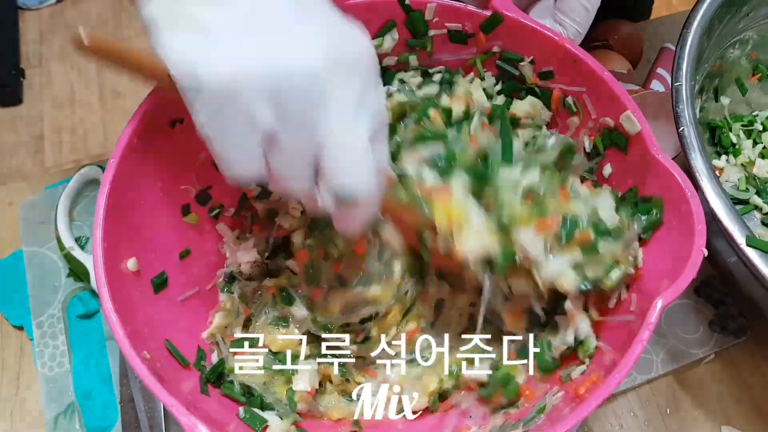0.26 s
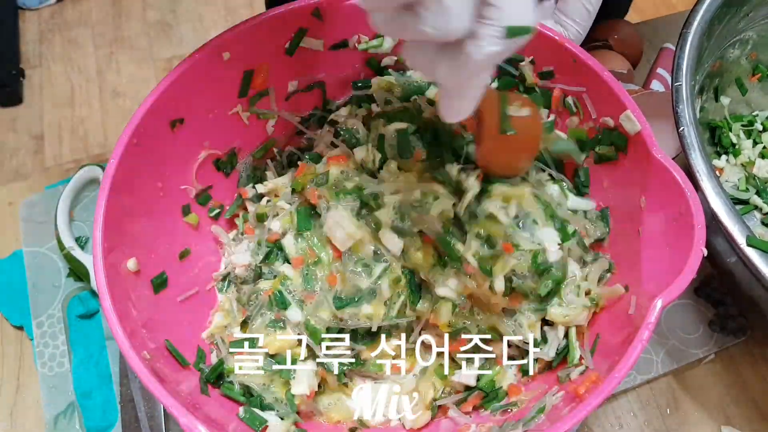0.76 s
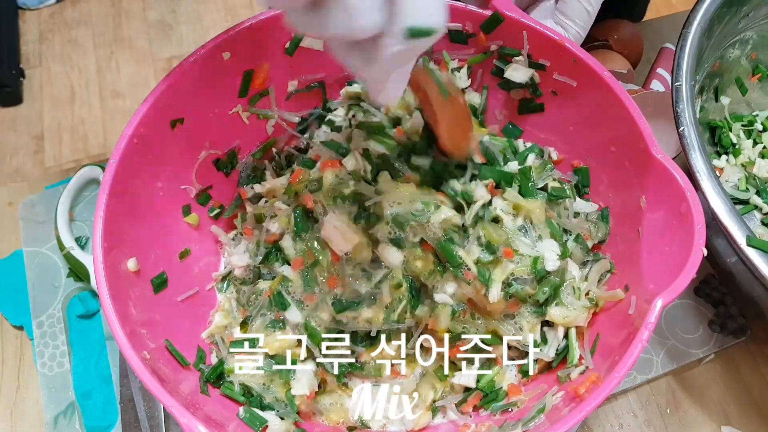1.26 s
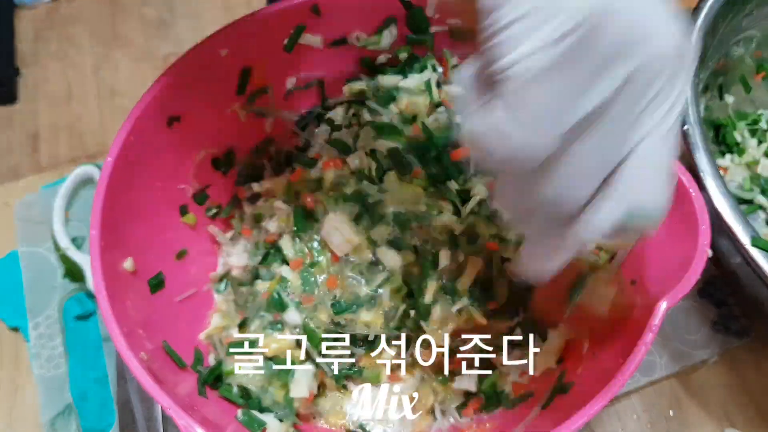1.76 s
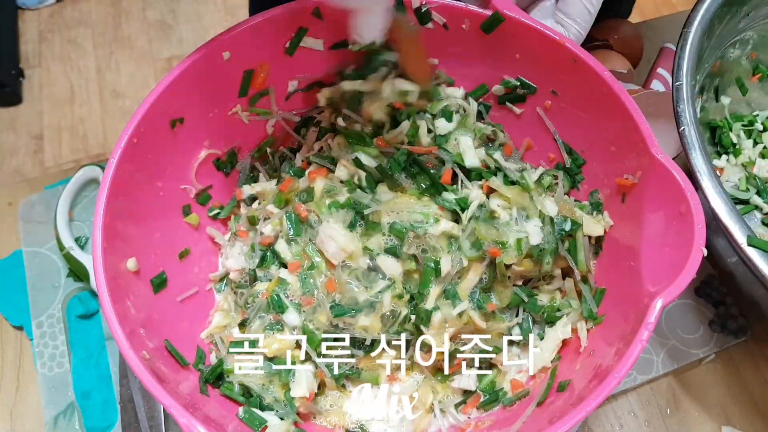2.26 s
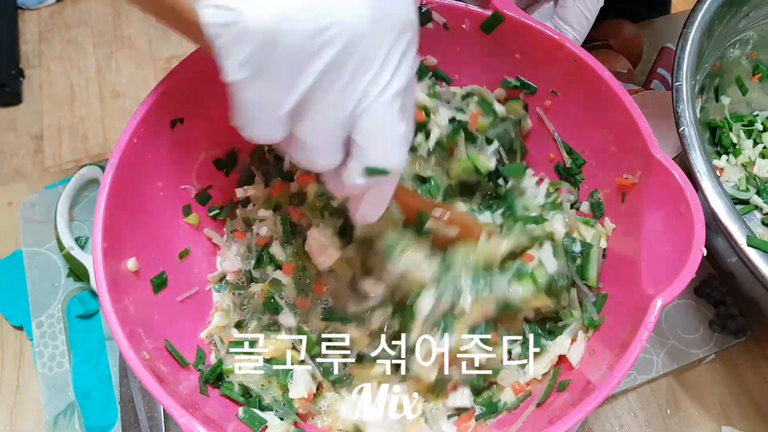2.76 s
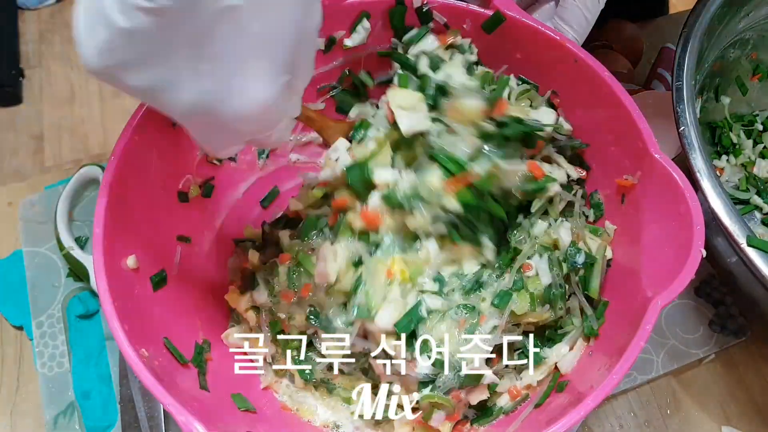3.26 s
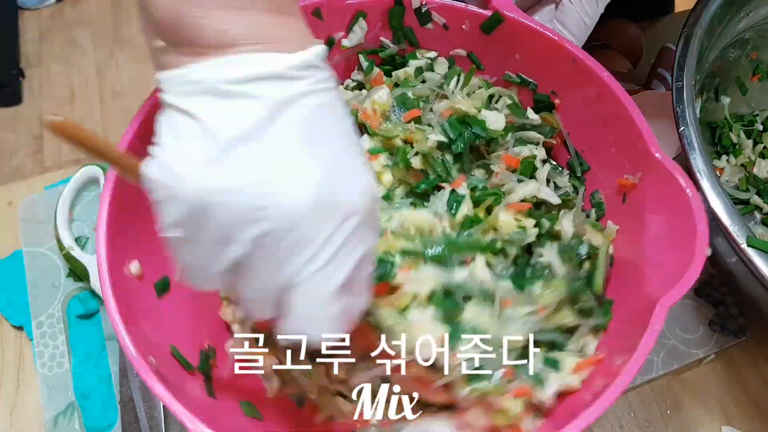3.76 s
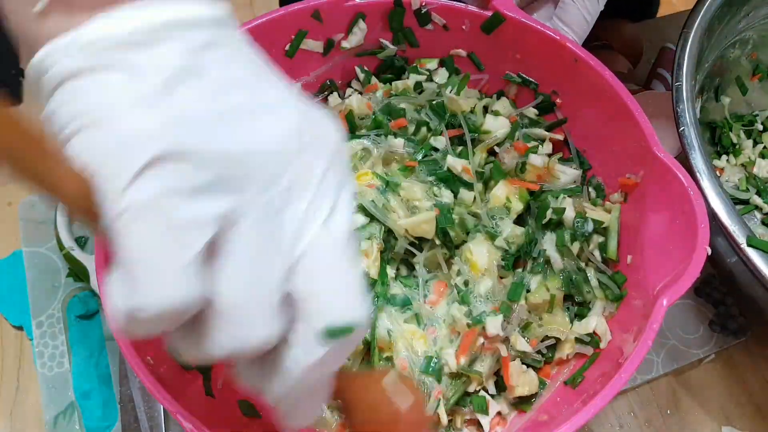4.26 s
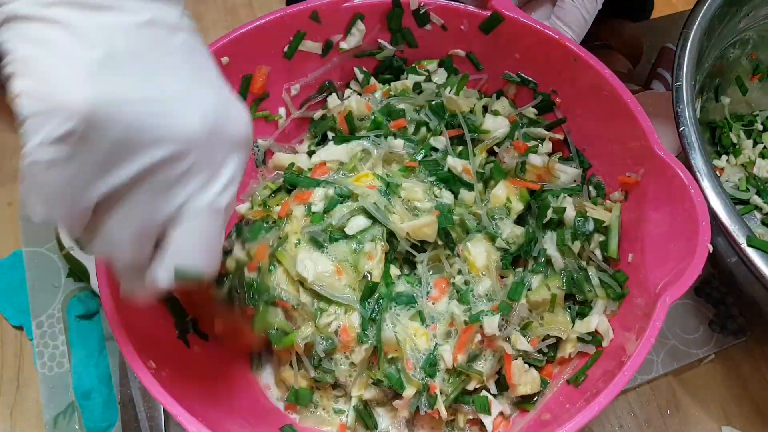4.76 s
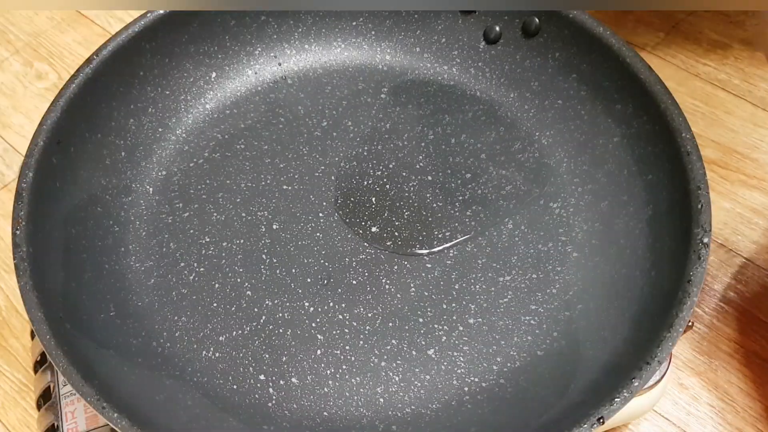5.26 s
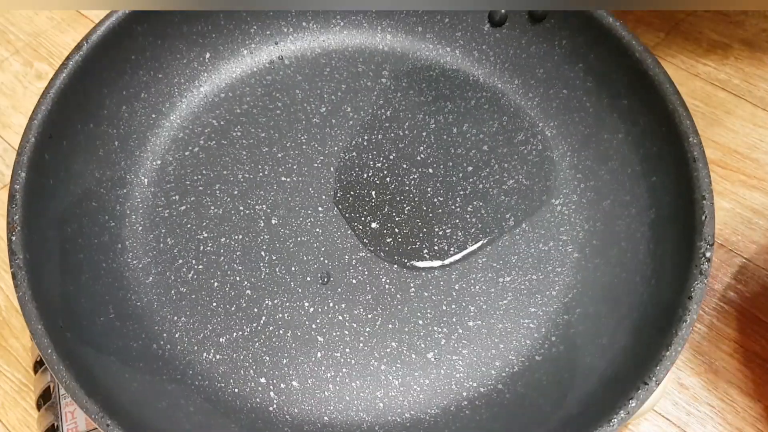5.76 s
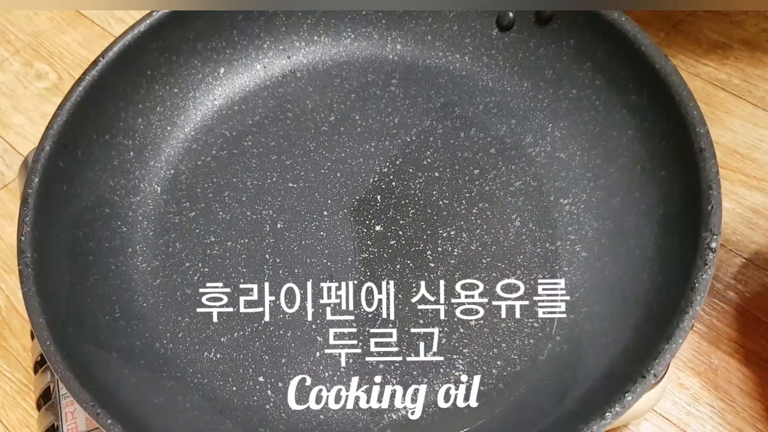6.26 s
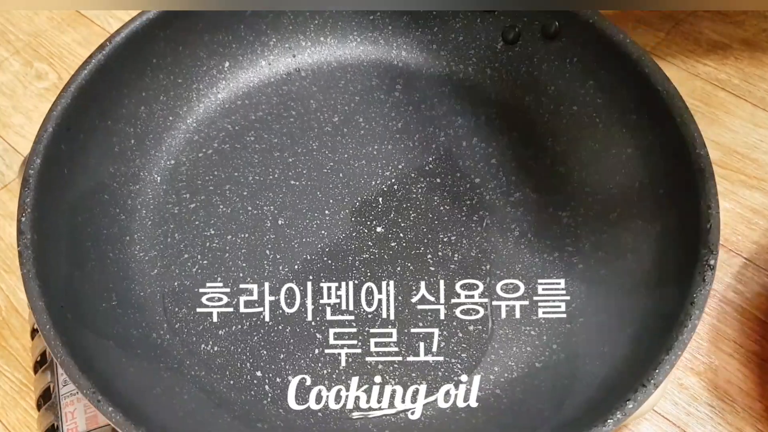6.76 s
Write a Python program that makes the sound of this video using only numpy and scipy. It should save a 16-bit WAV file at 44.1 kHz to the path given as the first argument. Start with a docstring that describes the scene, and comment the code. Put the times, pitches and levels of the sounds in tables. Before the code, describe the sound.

Moist batter squishes and crackles softly as a wooden spoon pushes it around, thudding against the plastic bowl with short hollow clacks. Quiet kitchen air and a low humming machine sit behind until the machine shuts off. An abrupt change brings a low, hollow burner roar and fine hiss; a pan gives light knocks, then a cluster of ringing, scraping clanks. Close microphones, small room with short echoes.

```python
"""First, a wooden spoon turns wet vegetable batter in a plastic bowl, over kitchen air and a low machine rumble.
Knocks are damped thumps plus bowl modes; squelches and the moist rustle are filtered clusters of tiny pops.
Partway through the mixing the rumble and its hum stop.
Then, at once, the stove: shaped noise makes a burner hum and hiss while a frying pan, built from dying modes
and chatter, is tilted and clanks on the grate. A small kitchen, a close pair of microphones."""
import sys
import numpy as np
from scipy import signal
from scipy.fft import rfft, irfft
from scipy.io import wavfile
from scipy.ndimage import uniform_filter1d

SR = 44100
rng = np.random.default_rng(int(sys.argv[2]) if len(sys.argv) > 2 else 0)


def master(y):
    """Save y as 16-bit WAV."""
    cut = np.clip(np.atleast_2d(y).T, -1, 1)
    pcm = np.round(cut * 32767)  # scale
    wavfile.write(sys.argv[1], SR, pcm.astype(np.int16))


N = 309700
TIME = np.arange(N) / SR
STOVE_S = 4.935  # the mixing gives way to the stove


def amp(db):
    """Decibels to gain."""
    return 10 ** (np.asarray(db) / 20)


def unit(x):
    """Scaled to rms 1."""
    return x / np.sqrt(np.mean(x ** 2) + 1e-20)


def level_attack(x, attack_s=.02):
    """Scaled to rms 1 over the first moments of a blow."""
    return x / np.sqrt(np.mean(x[..., :int(attack_s * SR)] ** 2) + 1e-20)


def read(points, hz):
    """Interpolates a table on a log-frequency axis."""
    f, value = np.transpose(points)
    return np.interp(np.log(hz + 1), np.log(f + 1), value)


def add(mix, s, sound):
    """Lays a stereo sound into the mix at s seconds."""
    part = mix[:, max(round(s * SR), 0):][:, :sound.shape[1]]
    part += sound[:, :part.shape[1]]


def colour(x, spectrum, size=2048):
    """Causal minimum-phase filter with the given spectrum, so clicks keep their sharp front."""
    log_gain = np.log(amp(read(spectrum, abs(np.fft.fftfreq(size, 1 / SR)))))
    response = np.exp(np.conj(signal.hilbert(log_gain)))
    taps = np.fft.ifft(response).real[:size // 2]
    return signal.fftconvolve(x, taps[None], axes=1)[:, :x.shape[1]]


def hump(hz, centre_hz, octaves):
    """Bell-shaped emphasis on a log-frequency axis, height 1."""
    return np.exp(-.5 * (np.log2(hz / centre_hz) / octaves) ** 2)


def voiced(spectrum, centre_hz, lift_db, octaves):
    """A spectrum with one broad resonance raised."""
    hz = np.geomspace(100, 20000, 70)
    return np.column_stack([hz, read(spectrum, hz) + lift_db * hump(hz, centre_hz, octaves)])


def crackle(envelope, per_s, spread_db, lag_s, side_db=3):
    """Tiny pops of uneven size under an envelope, each with its own lag and level between the two sides."""
    n = len(envelope)
    at = np.flatnonzero(rng.random(n) < per_s / SR)
    uneven = amp(spread_db * np.minimum(rng.exponential(1, len(at)), 4))
    size = envelope[at] * uneven * rng.choice([-1, 1], len(at))
    lag, side = rng.standard_normal((2, len(at)))
    at_right = np.clip(at + np.round(lag * lag_s * SR).astype(int), 0, n - 1)
    left = np.bincount(at, size * amp(side * side_db / 2), n)
    right = np.bincount(at_right, size * amp(-side * side_db / 2), n)
    return np.array([left, right])


def ring(modes, t, vary_db, detune, apart_hz):
    """Dying modes; each blow lands elsewhere, and high modes reach the two microphones out of step."""
    hz, db, t60 = np.transpose(modes)[:, :, None]
    size, tune, skew, phase = rng.uniform(-0.99, 1, (4, len(modes), 1))
    swing = np.exp(2j * np.pi * (hz * (1 + detune * tune) * t + phase))
    z = amp(db + vary_db * size - 60 * t / t60) * swing
    turn = np.exp(1j * np.sign(skew) * np.pi / 4 * np.minimum(hz / apart_hz, 1))
    onset = 1 - np.exp(-t / 0.001)
    return np.array([(z * turn).sum(0).imag, (z / turn).sum(0).imag]) * onset


def thump(t, hz, swell_s, apart):
    """A few swings of a heavily damped wall, reaching the microphones a phase angle apart."""
    turn = np.array([[1], [-1]]) * apart / 2
    return (t / swell_s) ** 2 * np.exp(-t / swell_s) * np.sin(2 * np.pi * hz * t + turn)


# spoon against the bowl: t/s, thud level/dB, thud f/Hz, clack level/dB, clack f/Hz, wet splat level/dB
SPOON_KNOCKS = [(0.977, -30, 930, -32.5, 2150, -40.5), (1.1899, -20, 995, -26.5, 1560, -36),
                (1.5077, -46.5, 760, -52.5, 2050, -58), (1.786, -34.5, 916, -39.6, 1760, -68),
                (1.8635, -42.7, 930, -54, 2060, -53), (1.931, -42, 1030, -40.5, 1670, -50.5),
                (2.0306, -38, 796, -40, 1880, -48), (2.261, -23.5, 1046, -30, 1640, -37),
                (3.0267, -26.5, 930, -34, 1480, -47), (4.3739, -26.7, 895, -34.5, 1730, -47.5),
                (4.5988, -28, 1015, -28.6, 1720, -53.5), (4.6762, -40.5, 820, -41.5, 2230, -49.5),
                (4.7697, -27, 983, -33, 2010, -39.5)]
# modes of the bowl loaded with batter: f/Hz, relative level/dB, t60/s
BOWL_MODES = [(232.4, -14, 0.063), (332, -12, 0.051), (618, -9.5, 0.087), (728, 3.5, 0.014),
              (830, 3.5, 0.017), (1080, -7.5, 0.033), (1207, -3, 0.054), (1512, -12, 0.094),
              (1810, -7, 0.038), (1960, -21, 0.06), (2390, 0.5, 0.021), (2700, -12.5, 0.031)]
# spectrum of the pushed mass of batter: f/Hz, relative level per Hz/dB
MASS_SPECTRUM = [(150, -8), (400, -8.5), (720, 2), (1050, -2.5), (1400, -4), (1950, -4), (2600, -4),
                 (3600, -20.5), (8000, -32), (16000, -58)]
# spectrum of bursting wet films: f/Hz, relative level per Hz/dB
SPRAY_SPECTRUM = [(500, -35), (2000, -20.5), (3200, 5), (4600, -0.5), (5800, -4), (7900, -1), (9300, -8),
                  (12000, -6), (16000, -7)]
SPLAT_HZ = 4440  # usual centre of the spray from squeezed batter


def knocks():
    """The spoon squeezes out a film of batter and hits the wall; the bowl rings briefly and its load shudders."""
    out, t = np.zeros((2, N)), np.arange(SR // 7) / SR
    for s, thud_db, thud_hz, clack_db, clack_hz, splat_db in SPOON_KNOCKS:
        low = ring(BOWL_MODES[:7], t, vary_db=3, detune=.03, apart_hz=1200)
        high = ring(BOWL_MODES[7:], t, vary_db=3, detune=.05, apart_hz=2000)
        load_pops = crackle(np.exp(-t / 0.013), per_s=4000, spread_db=0.0, lag_s=0.00021)
        shudder = colour(load_pops, MASS_SPECTRUM)
        apart = 0.67 * rng.choice([-1, 1])  # radians, to either side

        thud = level_attack(thump(t, thud_hz, swell_s=0.00071, apart=apart))
        thud = thud + amp(-11.0) * level_attack(low) + amp(-13.5) * level_attack(shudder)

        clack = level_attack(thump(t, clack_hz, swell_s=.0007, apart=apart))
        crack = thump(t, clack_hz, swell_s=0.00018, apart=apart)
        clack = clack + amp(-3) * level_attack(crack) + amp(-3) * level_attack(high)

        film = np.exp(-t / 0.0027) + amp(-16.5) * np.exp(-t / 0.028)
        pops = crackle(film, per_s=8300, spread_db=5.0, lag_s=.0001)
        splat = colour(pops, voiced(SPRAY_SPECTRUM, SPLAT_HZ, lift_db=6.0, octaves=1.0))

        add(out, s, amp(thud_db) * level_attack(thud) + amp(clack_db) * level_attack(clack))
        add(out, s - .0007, amp(splat_db) * level_attack(splat))  # the film bursts just before the wall is hit
    return out


# spoon strokes through the batter: start t/s, swell time/s, fade time/s, push level/dB, wet fizz level/dB
SPOON_STROKES = [(-0.02, 0.029, 0.11, -55, -60), (0.142, 0.091, 0.11, -45.5, -54.5),
                 (0.48, .07, 0.046, -57.5, -63.5), (0.76, 0.091, 0.055, -56.5, -59),
                 (0.93, 0.12, 0.068, -53.5, -58.5), (1.49, .11, 0.053, -50, -52.5),
                 (1.79, .12, 0.056, -50.5, -55), (1.98, 0.12, 0.036, -56, -58.5),
                 (2.53, 0.09, 0.046, -54.5, -61.5), (2.73, 0.091, 0.098, -57.5, -61),
                 (3.02, 0.058, 0.064, -57.5, -52.5), (3.109, 0.072, 0.078, -45.5, -52.5),
                 (3.45, 0.12, 0.08, -54.5, -66.5), (3.732, 0.11, 0.3, -52.5, -60.5),
                 (4.37, 0.094, 0.018, -62, -64.5), (4.77, 0.017, 0.1, -48.5, -51.5)]
SWELL_CURVE = 0.73  # power of time by which a stroke builds up


def strokes():
    """Strength of push and of fizz: each stroke swells as the spoon digs in, then fades as the batter settles."""
    power = np.zeros((2, N))
    for start, swell_s, fade_s, push_db, fizz_db in SPOON_STROKES:
        age = np.maximum(TIME - start, 0)
        swell = np.minimum(age / swell_s, 1) ** SWELL_CURVE
        shape = swell * np.exp(-np.maximum(age - swell_s, 0) / fade_s)
        power += (amp([[push_db], [fizz_db]]) * shape) ** 2
    return np.sqrt(power) * (TIME < STOVE_S)


def squelch(body_gain, pocket_hz, spray_gain, spray_hz, fade_s):
    """A cluster of bursting films, coloured by the air pocket behind it; slow tears pop more sparsely."""
    u = 2 * np.arange(SR // 14) / SR / fade_s
    pops = crackle((.3 + u) * np.exp(-u), per_s=1700 + 16 / fade_s, spread_db=3.2, lag_s=.00012)
    body = level_attack(colour(pops, voiced(MASS_SPECTRUM, pocket_hz, lift_db=9, octaves=.33)))
    spray = level_attack(colour(pops, voiced(SPRAY_SPECTRUM, spray_hz, lift_db=8, octaves=.28)))
    return body_gain * body + spray_gain * spray


# louder slaps of batter: t/s, body level/dB, air pocket f/Hz, spray level/dB, spray f/Hz, fade time/s
LOUD_SQUELCHES = [(0.008, -50, 800, -74, 3800, 0.0052), (0.040, -50, 2120, -55.5, 5330, 0.0075),
                  (0.232, -47, 1230, -50.5, 3900, .003), (0.711, -48, 860, -61, 5450, 0.0042),
                  (0.7244, -32, 1740, -35, 7840, 0.0065), (1.243, -47, 1320, -46, 5250, .004),
                  (1.517, -47, 1680, -52, 6500, .005), (1.563, -54, 1520, -51.5, 4700, 0.0062),
                  (2.305, -45.5, 1100, -51.5, 5750, 0.0063), (3.108, -48, 720, -74, 4250, 0.0018),
                  (3.122, -62, 1250, -48, 4800, 0.0055), (3.141, -44, 2270, -41.5, 4750, 0.0037),
                  (3.22, -47, 1820, -55, 4500, 0.0031), (3.358, -52.5, 900, -70, 4250, 0.0013),
                  (3.765, -52, 2480, -58.5, 3420, 0.0029), (3.82, -48, 710, -59, 7740, 0.0059),
                  (3.878, -40.5, 1780, -70, 3400, .012), (4.05, -66, 710, -57, 6540, 0.0019),
                  (4.168, -55, 1400, -75, 3700, 0.0028), (4.437, -50.5, 1080, -47.5, 6200, 0.0037),
                  (4.457, -45.5, 2380, -50.5, 5150, .005), (4.608, -34, 1070, -51, 3440, 0.0036),
                  (4.629, -45.5, 1310, -52.5, 6160, 0.0041), (4.6692, -46, 1580, -50, 5050, 0.0055),
                  (4.876, -53.5, 2110, -53, 4760, .013)]
# chance squelches: levels relative to the stroke that frees them, and a brief fade
SMALL_BODY_DB, SMALL_SPRAY_DB, SMALL_SPREAD_DB, SMALL_FADE_S = -3, -9, 3.5, .0025
POCKET_HZ, POCKET_OCTAVES = 1300, 0.46  # typical air pocket, and how far pockets differ


def squelches(push, fizz, count=70):
    """The loud slaps, and small ones scattered by chance that follow the strength of the stroke under way."""
    out = np.zeros((2, N))
    for s, body_db, pocket_hz, spray_db, spray_hz, fade_s in LOUD_SQUELCHES:
        add(out, s, squelch(amp(body_db), pocket_hz, amp(spray_db), spray_hz, fade_s))
    times = (np.arange(count) + rng.random(count)) * STOVE_S / count
    chances = np.clip(rng.standard_normal((count, 2)), -2, 2)
    for s, (size, pocket) in zip(times, chances):
        at = int(s * SR)
        pocket_hz = POCKET_HZ * 2 ** (POCKET_OCTAVES * pocket)
        body_gain, spray_gain = amp(SMALL_BODY_DB) * push[at], amp(SMALL_SPRAY_DB) * fizz[at]
        small = squelch(body_gain, pocket_hz, spray_gain, SPLAT_HZ, SMALL_FADE_S)
        add(out, s, amp(SMALL_SPREAD_DB * size) * small)
    return out


def smacks(envelope, edges_hz, per_s, spread_db):
    """Small wet pops of many sizes; each size sounds in its own narrow band."""
    bands = [signal.butter(2, pair, "band", fs=SR, output="sos") for pair in zip(edges_hz, edges_hz[1:])]
    return sum(signal.sosfilt(band, crackle(envelope, per_s, spread_db, lag_s=.00013)) for band in bands)


def stirring(push, fizz):
    """Chopped leaves slide and unstick in clumps, under the stroke of the spoon."""
    clumps = amp(2.4 * unit(uniform_filter1d(rng.standard_normal(N), 400)))  # 2.4 dB rms of unevenness
    large_hz = [150, 600, 1000, 1500, 2200, 3200, 6000]
    small_hz = [1500, 3600, 5200, 7500, 11000, 17000]
    mass = unit(colour(smacks(clumps, large_hz, per_s=700, spread_db=4), MASS_SPECTRUM))
    films = unit(colour(smacks(clumps, small_hz, per_s=650, spread_db=4.8), SPRAY_SPECTRUM))
    return push * mass + fizz * films


# pan on the grate: t/s, blow level/dB, metallic scrape level/dB
PAN_CLANKS = [(5.634, -39.5, -56), (5.9142, -46, -70), (6.118, -47, -71), (6.487, -31.5, -69),
              (6.663, -26, -29.5), (6.695, -30.8, -40), (6.75, -31.5, -66)]
# modes of the frying pan: f/Hz, relative level/dB, t60/s
PAN_MODES = [(535.7, 1.5, 0.17), (593, -5, 0.1), (725, -1.5, 0.094), (896, -3.5, 0.078), (1176, -3, 0.068),
             (1340, -17, 0.14), (1683, 0.5, 0.093), (1766, -2, 0.07), (2210, -10, 0.059),
             (2320, -13, 0.075), (2660, -12, .11), (3660, -20, 0.18), (4430, -13, 0.07), (4460, -17, 0.15),
             (5700, -18, 0.15), (6700, -14, .1), (6880, -21, .11), (7700, -18, .1), (8250, -9.5, 0.081),
             (8730, -16, .11)]
# spectrum of the iron grate rattling: f/Hz, relative level per Hz/dB
GRATE_SPECTRUM = [(200, -5), (420, -15.5), (560, 5), (900, -3.5), (1250, 4), (1750, -2), (2500, -8),
                  (3200, -12.5), (6000, -27.5), (16000, -74)]
# spectrum of metal scraping on the grate: f/Hz, relative level per Hz/dB
SCRAPE_SPECTRUM = [(800, -67), (2400, 6.5), (3200, -8.5), (4400, 5), (5300, -3), (6700, -1.5), (8700, -2),
                   (9800, -7), (12000, -12), (16000, -21)]
# rattle relative to the ring at the hardest blow; lighter blows rattle less
RATTLE_DB, RATTLE_DB_PER_DB = -1.5, 0.36


def clanks():
    """The pan rings and chatters on the iron grate; some contacts add a bright scrape."""
    out, t = np.zeros((2, N)), np.arange(SR // 3) / SR
    hardest_db = max(row[1] for row in PAN_CLANKS)
    for s, blow_db, scrape_db in PAN_CLANKS:
        rattle_db = RATTLE_DB + RATTLE_DB_PER_DB * (blow_db - hardest_db)
        contact = np.exp(-t / .008) + amp(-17) * np.exp(-t / .022)
        chatter = crackle(contact, per_s=5000, spread_db=2.2, lag_s=.00015)
        low = ring(PAN_MODES[:11], t, vary_db=2, detune=.004, apart_hz=2000)
        high = ring(PAN_MODES[11:], t, vary_db=2, detune=.004, apart_hz=3000)
        rattle = level_attack(colour(chatter, GRATE_SPECTRUM))
        body = level_attack(level_attack(low) + amp(rattle_db) * rattle)
        scrape = level_attack(amp(-8) * level_attack(high) + level_attack(colour(chatter, SCRAPE_SPECTRUM)))
        add(out, s, amp(blow_db) * body + amp(scrape_db) * scrape)
    return out


# likeness of the two channels of steady noise: f/Hz, left-right correlation
STEREO_LIKENESS = [(30, 1), (150, 0.95), (400, 0.84), (1000, 0.13), (2500, 0.084), (16000, 0.12)]


def noise(shape_db):
    """Steady stereo noise, alike in both ears in the bass; shape_db maps Hz to dB."""
    hz = np.fft.rfftfreq(N, 1 / SR)
    a, b = rfft(rng.standard_normal((2, N)))
    same = np.clip(read(STEREO_LIKENESS, hz), -1, 1)
    pair = np.array([a, same * a + np.sqrt(1 - same ** 2) * b])
    return unit(irfft(pair * amp(shape_db(hz)), N))


# spectrum of the burner's roar: f/Hz, relative level per Hz/dB
ROAR_SPECTRUM = [(12, -45), (20, -23.5), (163, 0), (198, -8.5), (499, -17.5), (780, -23.5), (1150, -28.5),
                 (1370, -31.5), (3630, -38), (4940, -38), (5530, -42), (7950, -38), (9400, -48),
                 (10500, -42), (16000, -48)]
ROAR_DB = -43.5
# hollow tones of the flame: f/Hz, width/Hz, level over the roar/dB
FLAME_PEAKS = [(60.6, 20, 4), (126, 6.4, 3), (151, 17, 2.5), (166.2, 3.7, 6), (230, 13.5, 8),
               (378, 15, 3.5), (508, 10, 8)]
# narrow bands of hiss from the jet: f/Hz, width/Hz, level over the roar/dB
HISS_PEAKS = [(4330, 110, 7), (4920, 190, 10), (6880, 80, 6), (7400, 300, 2), (8170, 130, 8),
              (10350, 350, 6), (10720, 250, 9)]


def burner():
    """Low flame roar with hollow tones, and narrow bands of hiss from the jet."""
    def shape_db(hz):
        """Roar spectrum with every peak raised above it."""
        peaks = FLAME_PEAKS + HISS_PEAKS
        return read(ROAR_SPECTRUM, hz) + sum(db * np.exp(-2 * ((hz - f) / width) ** 2) for f, width, db in peaks)
    flutter = amp(1.2 * unit(uniform_filter1d(rng.standard_normal(N), 2500)))  # 1.2 dB rms
    return amp(ROAR_DB) * unit(noise(shape_db) * flutter)


# spectrum of still kitchen air: f/Hz, relative level per Hz/dB
AIR_SPECTRUM = [(12, -17), (20, 4), (68, -4), (107, -6.5), (168, -5), (234, -5.5), (293, -10.5), (660, -13),
                (738, -11.5), (1400, -22), (2990, -24), (10200, -36), (14700, -34), (16000, -35)]
AIR_DB = -57
# spectrum of a low machine rumble: f/Hz, relative level per Hz/dB
RUMBLE_SPECTRUM = [(12, -31.5), (25, 3), (70, -1.5), (110, -9), (170, -8.5), (240, -7), (320, -14),
                   (700, -18.5), (1500, -25), (4000, -59.5)]
RUMBLE_DB, RUMBLE_OFF_S, RUMBLE_FADE_S = -52, 3.6, 0.069  # level, when it starts to stop, time to silence
# mains hum of that machine: f/Hz, rms level/dB
HUM_LINES = [(58, -62), (116, -74.5), (251, -65.5)]


def background():
    """Still kitchen air, and a low rumble with a wavering mains hum that stops partway through."""
    running = np.clip(1 - (TIME - RUMBLE_OFF_S) / RUMBLE_FADE_S, 0, 1)
    knots = np.linspace(0, TIME[-1], 40)
    hum = np.zeros(N)
    for hz, line_db in HUM_LINES:
        waver = 0.21 * np.interp(TIME, knots, rng.standard_normal(len(knots)))  # radians of phase
        hum += amp(line_db) * np.sqrt(2) * np.sin(2 * np.pi * hz * TIME + waver)
    rumble = amp(RUMBLE_DB) * noise(lambda hz: read(RUMBLE_SPECTRUM, hz))
    air = amp(AIR_DB) * noise(lambda hz: read(AIR_SPECTRUM, hz))
    return air + running * (rumble + hum)


# dying-away of the room: f/Hz, t60/s
ROOM_DECAY = [(150, 0.16), (800, 0.15), (2000, 0.37), (5500, 0.34), (15000, 0.32)]


def kitchen(x, early_db, tail_db):
    """Quick echoes from nearby surfaces, then a short tail that dies band by band."""
    t = np.arange(SR // 2) / SR
    taps = rng.standard_normal((2, len(t))) * (rng.random((2, len(t))) < 3000 / SR) * (t > .007)
    hz, at, z = signal.stft(taps, SR, nperseg=256)
    decay = amp(-60 * at / read(ROOM_DECAY, hz)[:, None])
    tail = signal.istft(z * decay, SR, nperseg=256)[1][:, :len(t)]
    early = crackle((t > .002) * np.exp(-t / 0.01), per_s=1200, spread_db=-5.5, lag_s=0.00011)
    early = amp(early_db) * early / np.linalg.norm(early)
    tail = amp(tail_db) * tail / np.linalg.norm(tail)
    echo = np.sqrt(2) * (early + tail)  # shares the energy over two channels
    return x + signal.fftconvolve(x, echo, axes=1)[:, :N]


def scene():
    """Mixing first, the stove afterwards."""
    stove = np.clip((TIME - STOVE_S) / 0.003, 0, 1)
    push, fizz = strokes()
    bowl = kitchen(knocks(), early_db=-9.0, tail_db=-14)
    batter = kitchen(squelches(push, fizz) + stirring(push, fizz), early_db=-5, tail_db=-13.5)
    pan = kitchen(clanks(), early_db=-10, tail_db=-10)
    return bowl + batter + pan + (1 - stove) * background() + stove * burner()


# difference between the two microphone ports: f/Hz, left minus right level/dB
PORT_DIFFERENCE = [(150, -0.5), (450, 1), (1000, -0.5), (2000, -1), (3300, -2), (5000, -1), (7000, -4),
                   (8400, -1.5), (10000, 4), (15000, 0)]


def record(dry):
    """Colour of each microphone port, bass cut and band limit."""
    hz = np.fft.rfftfreq(N, 1 / SR)
    ports = amp(np.array([[1], [-1]]) * read(PORT_DIFFERENCE, hz) / 2)
    coloured = irfft(rfft(dry) * ports, N)
    bass_cut = signal.butter(3, 46, "high", fs=SR, output="sos")
    band_limit = signal.firwin(301, 16000, window=("kaiser", 8), fs=SR)
    return signal.oaconvolve(signal.sosfilt(bass_cut, coloured), band_limit[None], "same")


dry = scene()
out = record(dry)
master(out)
```